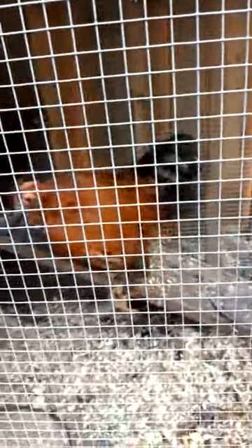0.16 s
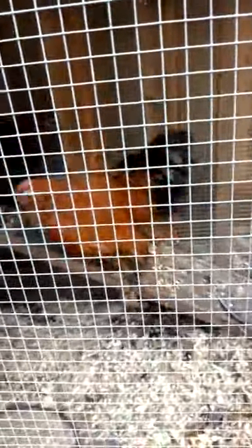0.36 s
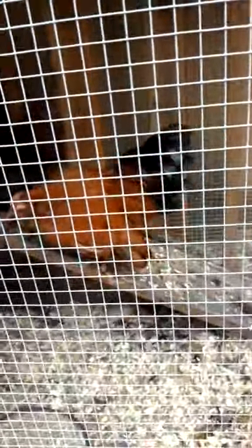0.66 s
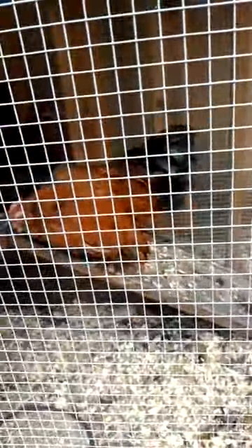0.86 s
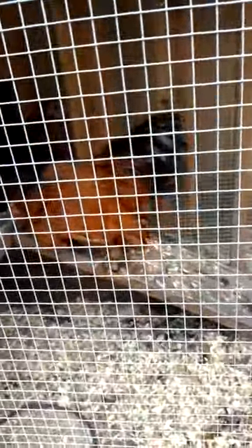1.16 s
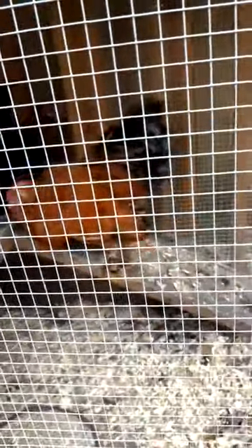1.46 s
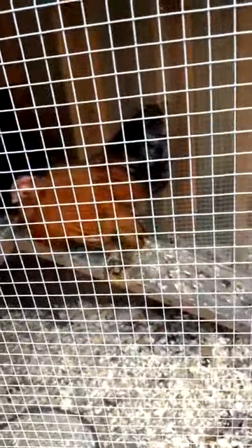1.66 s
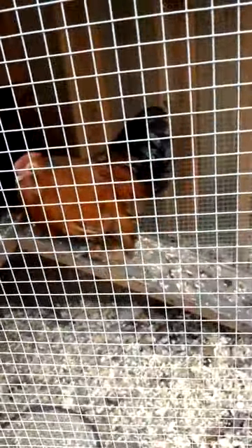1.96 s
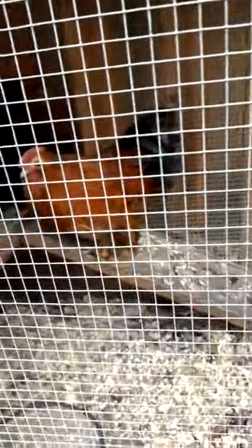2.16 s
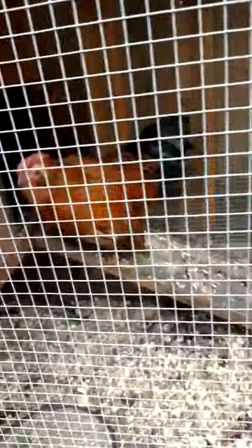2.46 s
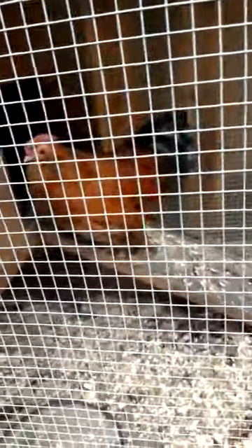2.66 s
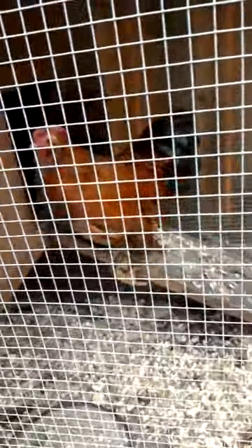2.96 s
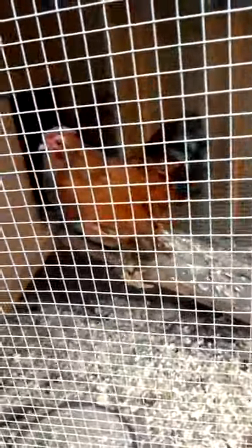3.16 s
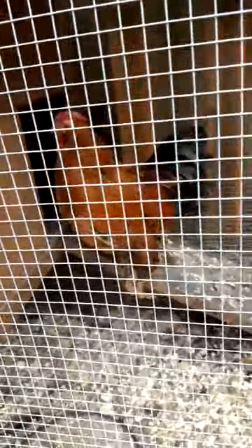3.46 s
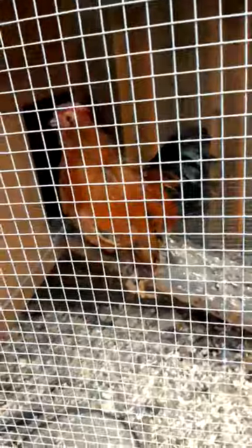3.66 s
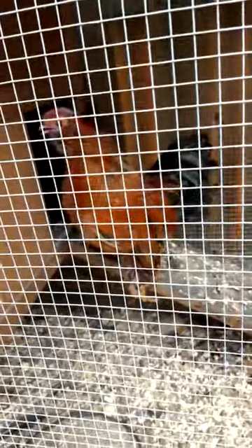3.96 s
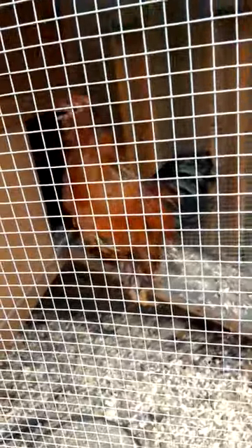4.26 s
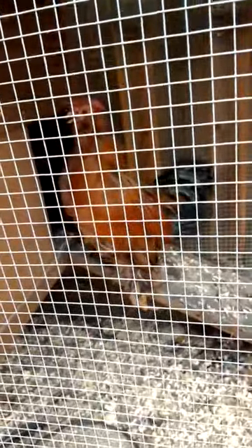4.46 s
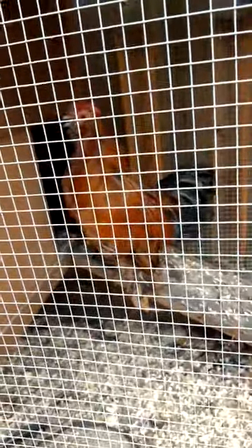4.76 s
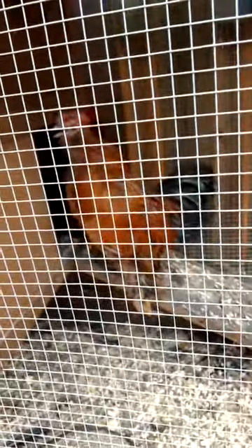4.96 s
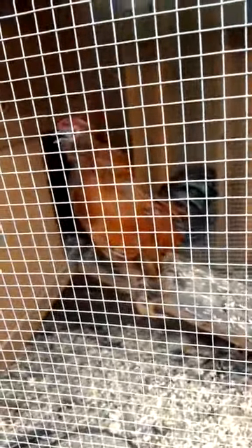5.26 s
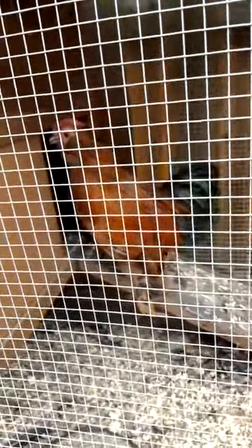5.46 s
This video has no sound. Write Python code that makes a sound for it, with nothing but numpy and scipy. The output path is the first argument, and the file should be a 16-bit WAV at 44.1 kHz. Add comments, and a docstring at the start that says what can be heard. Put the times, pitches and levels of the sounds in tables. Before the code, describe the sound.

Close to a wooden coop outdoors, brief quiet clucks are followed by scattered clicks, knocks and faint rustles as a rooster steps through dry litter. A very faint high bird whistle repeats far away above a low rumble and hum. Then the rooster lets out a single high, hoarse crow, far louder than everything else, with one short note and one long note that ends lower.

```python
"""Soft clucks come first, with claws and beak tapping on the boards and litter of a wooden coop.
A small bird whistles thinly far away, over a low outdoor rumble and hum. Then a bantam rooster crows
close by: a short note, and a long one that breaks between rasp and clean tone and ends an octave down.
The crow follows the source-filter principle: membranes in the syrinx pulse, and the resonances of
windpipe, throat and beak shape the overtones. Irregular pulses rasp; a doubled period drops the octave."""
import sys
import numpy as np
from scipy import signal
from scipy.fft import rfft, irfft, next_fast_len
from scipy.io import wavfile
from scipy.ndimage import uniform_filter1d, minimum_filter1d, map_coordinates

SR = 44100
rng = np.random.default_rng(int(sys.argv[2]) if len(sys.argv) > 2 else 0)


def to_wav(sig):
    """Store sig (one row per channel, or 1-D mono) as 16-bit WAV at the path in sys.argv[1].

    Samples outside -1..1 are clipped; the rate is SR.
    """
    pcm = np.clip(np.atleast_2d(sig), -1, 1) * 32767
    pcm = np.round(pcm).astype(np.int16)
    wavfile.write(sys.argv[1], SR, pcm.T)  # frames by channels


N = 247401

# Spectra of the far rumble and of moving air: frequency_hz, relative_db
RUMBLE_SPECTRUM = [(20, -32), (35, -7), (55, -5), (75, 8), (105, -1.5), (160, -3), (260, -10), (380, -13.5),
                   (600, -28.5), (1300, -90)]
AIR_SPECTRUM = [(250, -14), (450, 0.5), (750, -3.5), (1150, 2), (2000, -7.5), (3500, -15), (8000, -16),
                (15500, -21.5)]
# Their slow envelopes: time_s, level_db
RUMBLE_ENVELOPE = [(0, -62.5), (3.1, -63), (3.55, -60), (4.7, -63.5), (4.95, -74), (5.6, -75)]
AIR_ENVELOPE = [(0, -62.5), (.7, -69.5), (2.4, -72.5), (5.6, -73.5)]
# Partials of the far hum: frequency_hz, relative_db
HUM_PARTIALS = [(86.1, -83), (107.7, -63), (172.3, -65), (274.5, -71.5), (393.0, -78.5), (565.2, -81)]
# Reverberation time of the coop: frequency_hz, t60_s
COOP_DECAY = [(200, 0.31), (900, 0.22), (2500, 0.26), (5000, 0.22), (8000, 0.2), (14000, 0.25)]
# Calls of the distant bird: start_s, length_s, pitch_hz, level_db
BIRD_WHISTLES = [(0.945, 0.25, 7500, -64.5), (2.037, 0.23, 7430, -64.5), (2.803, 0.28, 7530, -62.5),
                 (3.46, 0.25, 7450, -61)]
# Shuffles in the litter: peak_s, level_db, fade_db_per_s
SHUFFLES = [(.18, -64, 27), (.49, -84.5, 75), (.9, -91.5, 14), (2, -65.5, 113), (2.88, -73.5, 53)]
# Contacts of claws and beak: start_s, click_db, board_db, brightness_db
CONTACTS = [(0.16, -52.5, -48, 10.5), (.214, -37, -52, 1.5), (.278, -49, -62, 6), (0.283, -53, -53, 7),
            (0.46, -54.5, -77, -3.5), (0.504, -58.5, -77, 6.5), (.922, -44, -30.5, -1.5),
            (.963, -44, -44.5, 1.5), (1.333, -46.5, -44.5, -8), (1.428, -49, -48, -6.5),
            (1.899, -58.5, -83, 1.5), (2.046, -48, -50.5, 0.5), (2.376, -49.5, -66, 8),
            (2.401, -50.5, -71, 0.5), (2.528, -56, -66, 0.5), (2.547, -59, -50.5, 3.5),
            (2.594, -58, -53.5, 1.5), (2.77, -59, -80, 6.5), (2.937, -65, -62.5, 8),
            (3.089, -67.5, -65, -2)]
# Modes of a board: frequency_hz, relative_db, t60_s
BOARD_MODES = [(175, -12, 0.13), (366, -14.5, 0.15), (419, 3.5, 0.047), (559, -8, 0.062), (760, -10, 0.06),
               (1043, -7, 0.033)]
# Broad resonances of dry litter under a tap: centre_hz, width_hz, gain_db
LITTER_RESONANCES = [(1640, 1100, -10.5), (2700, 310, -6), (3420, 760, 5.5), (4140, 430, 4),
                     (5530, 1800, 5), (8720, 2000, -3), (10000, 2200, -15.5)]
# Soft clucks: start_s, length_s, pitch_hz, level_db, beak_opening (0-1)
CLUCK_CALLS = [(0, 0.067, 400.4, -37, 0.02), (0.058, 0.04, 383, -46.5, 0), (0.135, 0.069, 420, -39, 0.1),
               (0.29, 0.018, 477, -45.5, 1), (0.304, 0.025, 363, -42, 0.63)]
# Spectrum of a cluck with the beak closed and open: frequency_hz, relative_db
CLOSED_BEAK_SPECTRUM = [(200, -4), (400, 2), (800, -10.5), (1200, -20), (1600, -20.5), (2000, -27.5),
                        (2600, -57), (5000, -67)]
OPEN_BEAK_SPECTRUM = [(200, -14), (380, -15.5), (700, -5.5), (1000, -2), (1400, -15), (2000, -34),
                      (5000, -52)]
# Resonances of windpipe, throat and open beak: centre_hz, width_hz, gain_db
FORMANTS = [(415, 480, -34), (923, 242, 0.5), (1000, 370, -19.5), (1638, 190, -4.5), (1860, 140, -5.5),
            (2132, 150, -5.5), (2406, 443, 3.5), (2835, 510, -25.5), (3179, 193, 2.5), (3450, 520, -22.5),
            (3705, 450, -22.5), (4568, 147, -23), (4647, 620, -19), (5434, 510, -46), (6980, 550, -28.5),
            (7575, 360, -19), (8170, 240, -19), (8810, 580, -34.5), (9560, 434, -22.5),
            (10440, 3400, -40.5), (12650, 1200, -46), (13900, 3300, -44.5)]
# Pitch of the crow before period doubling, one list a note, the short one first: time_s, pitch_hz
CROW_MELODIES = [
    [(4.112, 895), (4.142, 903), (4.155, 945), (4.166, 948), (4.173, 914), (4.21, 932), (4.3, 910)],
    [(4.403, 780), (4.424, 870), (4.443, 1191), (4.46, 1226), (4.486, 1207), (4.5, 1115), (4.513, 1066),
     (4.52, 900), (4.606, 925), (4.62, 1067), (4.666, 1182), (4.698, 1187), (4.715, 1078), (4.755, 1020),
     (4.771, 928), (4.785, 944), (4.791, 1059), (4.845, 1050), (4.88, 1022), (4.935, 1018), (4.941, 938),
     (5.001, 937), (5.1, 923), (5.235, 900), (5.241, 947), (5.31, 940), (5.33, 910), (5.369, 902),
     (5.405, 862), (5.446, 600)],
]
# Effort in each note, with the ring near 4.8 kHz relative to the voice: time_s, level_db, ring_db
SHORT_NOTE_EFFORT = [(4.11, -69, -9), (4.126, -19.5, -14), (4.138, -7, -15.5), (4.156, -3.5, -17.5),
                     (4.202, 5, -29.5), (4.274, -13, -21.5), (4.304, -36, -13), (4.32, -46.5, -17.5)]
LONG_NOTE_EFFORT = [(4.4, -78.5, -33), (4.41, -20, 3.5), (4.426, -2, -11), (4.468, 0, 1.5),
                    (4.52, -4.5, -15), (4.538, -18.5, 3), (4.584, -5, -12), (4.696, -7, 2),
                    (4.708, -8.5, -17), (4.774, -7.5, -5), (4.804, 2, -31.5), (4.864, -12, -24.5),
                    (5.014, -7.5, -26.5), (5.146, -8, -14), (5.27, -9.5, -28.5), (5.408, -10, -29.5),
                    (5.446, -26, -30), (5.468, -48, -26.5)]
# Voice breaks, where the membranes flap irregularly: start_s, end_s, rasp (0-1)
VOICE_BREAKS = [(4.119, 4.133, 0.95), (4.14, 4.228, 0.02), (4.237, 4.264, 1), (4.281, 4.324, .95),
                (4.394, 4.419, 1), (4.42, 4.436, 0.35), (4.482, 4.52, .17), (4.528, 4.562, 0.99),
                (4.558, 4.58, 0.44), (4.583, 4.594, 0.8), (4.617, 4.625, 1), (4.63, 4.644, .2),
                (4.729, 4.76, .8), (4.77, 4.785, 0), (4.943, 4.947, 0.07), (5.239, 5.238, 0.33),
                (5.313, 5.406, 0.01), (5.411, 5.433, 0.21), (5.432, 5.471, 0.67)]
# Boundaries between the crow's seven bands, the middle band being the ring: edge_hz
VOICE_BAND_EDGES = [1400, 2700, 4050, 6100, 8900, 11700]
# Balance of the other six bands, low to high, in the easy tone and what each state adds to it:
# easy_db, strain_db, rasp_db, octave_drop_db, gape_db
BAND_BALANCE = [(2, -7, -10.5, -0.5, 2), (-8.5, 8.5, 6, 4.5, -2.5), (-18.5, 10.5, 7.5, 7, -3),
                (-10, -12, -3, -7, -10), (-31, 3.5, 3, 5, 13), (-31, -1, -0.5, -7, 2)]

HUM_PEAK_S, HUM_PEAK_DB, HUM_FADE_DB_PER_S, HUM_REST_DB = 3.55, 2, 15, -14
RUSTLE_RISE_DB_PER_S = 178
CRUNCH_T60_S, SCATTER_DB, SCATTER_T60_S = 0.033, -25.5, 0.073
CLUCK_ATTACK_S, CLUCK_RELEASE_SHARE, CLUCK_FALL_SHARE = 0.0033, 0.68, 0.15
BREAK_ONSET_S, BREAK_SETTLE_S = 0.0022, 0.0044
OCTAVE_DROP_S, RASP_DOUBLING = 5.238, 0.23  # before the drop, rasp doubles the period only partly
EASY_HZ, STRAIN_HZ = 926.7, 188  # the pitch the windpipe favours; the rise over which strain builds
CLEAN_RASP, SLACK_RASP, STRAIN_RASP = .006, .022, .016  # roughness that remains between breaks
TOP_HZ = 15900


def amp(db):
    """Decibels to amplitude ratio."""
    return 10 ** (np.asarray(db) / 20)


def unit(x):
    """Normalisation to rms 1."""
    return x / np.sqrt(np.mean(x ** 2) + 1e-20)


def along(points, hz):
    """Interpolation of (frequency_hz, value) points on a log axis."""
    f, v = np.transpose(points)
    return np.interp(np.log(hz + 1), np.log(f + 1), v)


def glide(points, t):
    """Linear interpolation of (time_s, value) points."""
    return np.interp(t, *np.transpose(points))


def wobble(rate, n):
    """Smooth random modulation: n samples, rate knots a second."""
    return map_coordinates(rng.standard_normal(int(N * rate / SR) + 4), [np.arange(n) * rate / SR])


def filtered(x, response):
    """Linear filtering: the spectrum of x times a frequency response."""
    m = next_fast_len(len(x) + 8192)
    return irfft(rfft(x, m) * response(np.fft.rfftfreq(m, 1 / SR)), m)[:len(x)]


def below(hz, edge_hz, order):
    """Low-pass response."""
    return 1 / (1 + (hz / edge_hz) ** order)


def resonances(modes, hz):
    """Response of parallel resonances with steep skirts."""
    return sum(amp(db) / (1 + (2 * (hz - centre) / width) ** 2) ** 1.5 for centre, width, db in modes)


def noise(response, n):
    """White noise coloured by a response, at rms 1."""
    return unit(filtered(rng.standard_normal(n), response))


def add(track, start_s, sound):
    """Superposition of a sound on the track."""
    part = track[max(round(start_s * SR), 0):][:len(sound)]
    part += sound[:len(part)]


def outdoors():
    """Far rumble and faint moving air: coloured noise under slow amplitude modulation."""
    t = np.arange(N) / SR
    rumble_gain = amp(glide(RUMBLE_ENVELOPE, t) + 2.6 * wobble(7.6, N))
    rumble = noise(lambda hz: amp(along(RUMBLE_SPECTRUM, hz)), N)
    air_gain = amp(glide(AIR_ENVELOPE, t) + wobble(3.7, N))
    air = noise(lambda hz: amp(along(AIR_SPECTRUM, hz)), N)
    return rumble_gain * rumble + air_gain * air


def hum():
    """A far hum swells and fades: a sum of low partials, each wavering in amplitude and phase."""
    t = np.arange(N) / SR
    tones = sum(amp(db + 2 * wobble(3, N)) * np.sin(2 * np.pi * hz * t + wobble(5.2, N))
                for hz, db in HUM_PARTIALS)
    swell_db = HUM_PEAK_DB - HUM_FADE_DB_PER_S * np.abs(t - HUM_PEAK_S)
    return amp(np.maximum(swell_db, HUM_REST_DB)) * tones


def coop(x):
    """Reverberation: reflections from the wooden walls decay exponentially, the bass lasting longest."""
    hz, t, spectrum = signal.stft(rng.standard_normal(SR // 2), SR, nperseg=256)
    decay = amp(-60 * t / along(COOP_DECAY, hz)[:, None])
    tail = signal.istft(spectrum * decay, SR, nperseg=256)[1]
    impulse_response = np.pad(tail, (SR // 200, 0)) / np.linalg.norm(tail)  # 5 ms late
    return signal.fftconvolve(x, impulse_response)[:N]


def small_bird(quaver_hz=170, fall_share=0.0194):
    """Thin whistles: pure tones that sink a little and quaver by fast frequency modulation."""
    track = np.zeros(N)
    for start_s, length_s, hz, db in BIRD_WHISTLES:
        progress = np.linspace(0, 1, int(length_s * SR))
        pitch = hz * (1 - fall_share * (progress - .5)) + quaver_hz * wobble(480, len(progress))
        envelope = np.sqrt(np.abs(np.sin(np.pi * progress)))
        add(track, start_s, amp(db) * envelope * np.sin(2 * np.pi * np.cumsum(pitch) / SR))
    return track


def litter():
    """Granular noise: shavings rustle underfoot, each shuffle swelling quickly and dying away."""
    t = np.arange(N) / SR
    envelope = sum(amp(db - np.maximum(RUSTLE_RISE_DB_PER_S * (peak_s - t), fade * (t - peak_s)))
                   for peak_s, db, fade in SHUFFLES)
    # frequency_hz, relative_db
    colour = [(1000, -12.5), (2500, -7), (4500, -3), (7000, -5), (9500, .5), (12000, -9), (16000, -20.5)]
    hiss = noise(lambda hz: amp(along(colour, hz)), N)
    grains = amp(6.5 * wobble(1000, N))
    return envelope * unit(hiss * grains)


def crunch(t, brightness_db):
    """Noise through the resonances of crushed litter; spectral tilt turns it from knock to fizz."""
    def band(low_hz, high_hz):
        """Band-pass noise coloured by the litter."""
        return noise(lambda hz: (resonances(LITTER_RESONANCES, hz) + 0.43)
                     * below(hz, high_hz, order=8) * (1 - below(hz, low_hz, order=8)), len(t))

    knock = amp(-brightness_db) * band(800, 2500)
    click = amp(4) * band(3000, 6500)
    fizz = amp(4 + brightness_db) * band(7500, 11500)
    # after the first blow, shavings slip unevenly and scatter
    slips = amp(2.5 * wobble(450, len(t)) + 5 * np.minimum(t / .015, 1) * wobble(200, len(t)))
    decay = amp(-60 * t / CRUNCH_T60_S) + amp(SCATTER_DB - 60 * t / SCATTER_T60_S)
    return (knock + click + fizz) * slips * decay


def taps(tick_db=7, tick_t60_s=0.0086):
    """Impact excitation: each contact ticks, rings the board's damped modes and crunches the litter."""
    track, t = np.zeros(N), np.arange(SR // 4) / SR
    for start_s, click_db, board_db, brightness_db in CONTACTS:
        board = sum(amp(db + rng.normal(0, 1.8) - 60 * t / t60_s)
                    * np.sin(2 * np.pi * hz * rng.normal(1, 0.042) * t) for hz, db, t60_s in BOARD_MODES)
        shavings = crunch(t, brightness_db)
        tick = noise(lambda hz: below(hz, 7300, order=6) - below(hz, 1700, order=4), len(t))
        tick *= amp(tick_db - 60 * t / tick_t60_s)
        sound = amp(board_db) * board + amp(click_db) * (shavings + tick)
        rise_s = np.clip(.0008 * amp(-2 * brightness_db), 2e-4, .004)  # soft, dull contacts start slowly
        add(track, start_s, sound * (1 - np.exp(-t / rise_s)))
    return track


def cluck(length_s, hz, opening, jitter_rad=.09, open_jitter_rad=0.67):
    """A sagging harmonic series filtered by the beak; opening it makes the call brighter and rougher."""
    t = np.arange(int(length_s * SR)) / SR
    pitch = hz * (1 - CLUCK_FALL_SHARE * (t / length_s) ** 2)
    jitter = (jitter_rad + open_jitter_rad * opening) * wobble(244, len(t))
    phase = 2 * np.pi * np.cumsum(pitch) / SR + jitter
    beak = lambda f: amp((1 - opening) * along(CLOSED_BEAK_SPECTRUM, f)
                         + opening * along(OPEN_BEAK_SPECTRUM, f))
    attack = np.minimum(t / CLUCK_ATTACK_S, 1)
    release = np.minimum((1 - t / length_s) / CLUCK_RELEASE_SHARE, 1)
    return attack * release * unit(sum(beak(k * pitch) * np.sin(k * phase) for k in range(1, 9)))


def voice_breaks(t):
    """Rasp of irregular vibration: each break sets in abruptly and relaxes exponentially into tone."""
    return np.max([rasp * np.exp(np.minimum(t - start, 0) / BREAK_ONSET_S
                                 - np.maximum(t - end, 0) / BREAK_SETTLE_S)
                   for start, end, rasp in VOICE_BREAKS], axis=0)


def syrinx(pitch, rasp, doubling, jitter_rad=0.57, shimmer=0.31, hiss_db=-13, chirp_rad=.5):
    """Membrane pulses: rasp scatters their timing and size; period doubling adds half-order partials."""
    n = len(pitch)
    jitter = jitter_rad * (wobble(850, n) + wobble(240, n))
    waver = 1 + 0.0017 * wobble(70, n) + .04 * rasp * wobble(90, n)
    phase = 2 * np.pi * np.cumsum(pitch * waver) / SR + rasp * jitter
    pulses = np.zeros(n)
    for k in np.arange(1, 41) / 2:
        hz = k * pitch
        # as the head moves among the walls, short wavelengths swell and fade most
        depth_db = 4 * np.minimum(hz / 6000, 1.5)
        fading_db = depth_db * (wobble(22, n) + (.25 + np.sqrt(rasp)) * wobble(170, n))
        rattle_db = 4 * np.sqrt(rasp) * wobble(130, n)  # in a break, energy jumps between overtones
        slack_db = -4 * doubling * (hz / 10000) ** 2  # slack membranes close more gently
        size = amp(fading_db + rattle_db + slack_db) * below(hz, TOP_HZ, order=40)
        if k % 1:
            size *= doubling * amp(1)
        pulses += size * np.cos(k * phase - chirp_rad * k * k)  # higher overtones leave later
    turbulence = amp(hiss_db) * (rasp + 0.0029) * rng.standard_normal(n) * (1 + np.cos(phase))
    return pulses / 3 * (1 + shimmer * rasp * wobble(300, n)) + 2 * turbulence


def throat(hz):
    """Formant filter of the vocal tract, which radiates almost nothing at low frequencies."""
    return resonances(FORMANTS, hz) * (1 - below(hz, 540, order=5))


def band_shares(strain, rasp, slack, ring):
    """Spectral balance at constant power: strain, rasp and slack move energy up to the midrange."""
    gape = np.tanh((ring / 0.21) ** 2)  # the ring is strongest with the beak wide open
    shares = np.array([amp(easy + strained * strain * (1.5 - rasp) + rough * rasp
                           + dropped * slack + gaping * gape)
                       for easy, strained, rough, dropped, gaping in BAND_BALANCE])
    shares /= np.linalg.norm(shares, axis=0)
    shares = np.insert(shares, len(BAND_BALANCE) // 2, ring, axis=0)
    return shares / np.linalg.norm(shares, axis=0)


def rebalance(source, shares):
    """Envelope shaping in a filter bank: each band's short-time rms is set to its share."""
    window = signal.windows.hann(SR // 60)
    rest, voice = source, 0
    for edge_hz, share in zip(VOICE_BAND_EDGES + [SR / 2], shares):
        band = filtered(rest, lambda hz: below(hz, edge_hz, order=40))
        rest = rest - band
        power = np.abs(signal.fftconvolve(band ** 2, window / window.sum(), "same"))
        voice = voice + share * band / np.sqrt(power + 1e-12)
    return voice


def crow(melody, effort, attack_s=0.0054, release_s=0.021):
    """Source and filter: for one note the syrinx sounds through the throat."""
    time_s, level_db, ring_db = np.transpose(effort)
    t = np.arange(round(time_s[0] * SR), round(time_s[-1] * SR)) / SR
    pitch = glide(melody, t)
    slack = np.clip((t - OCTAVE_DROP_S) / 0.012, 0, 1)  # slack membranes double the period
    strain = np.maximum(np.tanh((pitch - EASY_HZ) / STRAIN_HZ), -.2)
    rasp = np.clip(voice_breaks(t) + CLEAN_RASP + SLACK_RASP * slack + STRAIN_RASP * np.abs(strain), 0, 1)
    ring = amp(np.interp(t, time_s, ring_db))
    pulses = syrinx(pitch, rasp, doubling=np.maximum(slack, RASP_DOUBLING * rasp))
    voice = rebalance(filtered(pulses, throat), band_shares(strain, rasp, slack, ring))
    gate = np.minimum((t - t[0]) / attack_s, 1) ** 2 * np.minimum((t[-1] - t) / release_s, 1)
    return amp(np.interp(t, time_s, level_db)) * gate * voice


def rooster():
    """Voiced sound of the bantam: soft clucks, and later the two notes of the crow."""
    track = np.zeros(N)
    for start_s, length_s, hz, db, opening in CLUCK_CALLS:
        add(track, start_s, amp(db) * cluck(length_s, hz, opening))
    for melody, effort in zip(CROW_MELODIES, (SHORT_NOTE_EFFORT, LONG_NOTE_EFFORT)):
        add(track, effort[0][0], crow(melody, effort))
    return track


def scene():
    """Direct and reverberant sound: the rooster faces the listener, so his voice is the drier source."""
    voice = rooster()
    small_sounds = taps() + litter() + small_bird()
    reverberation = coop(amp(-18) * voice + amp(-9) * small_sounds)
    return (voice + small_sounds + reverberation + outdoors() + hum())[None]


def record(dry):
    """Peak limiting and band limiting: a fast gain dip holds the peaks, and nothing passes TOP_HZ."""
    needed_gain = .98 / np.maximum(np.abs(dry[0]), .98)
    held_gain = minimum_filter1d(needed_gain, size=441)
    smooth_gain = uniform_filter1d(uniform_filter1d(held_gain, size=221), size=221)
    return filtered(dry[0] * smooth_gain, lambda hz: hz < TOP_HZ)[None]


dry = scene()
out = record(dry)
to_wav(out)
```